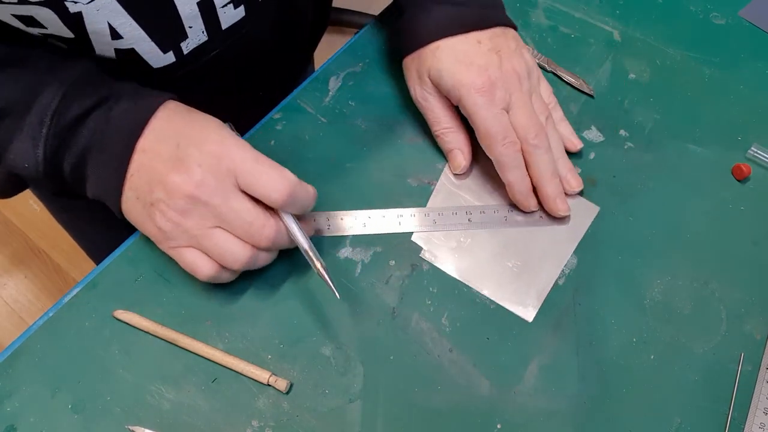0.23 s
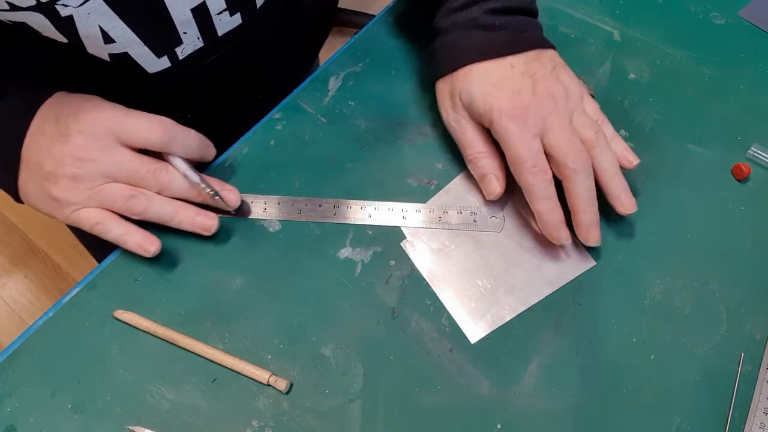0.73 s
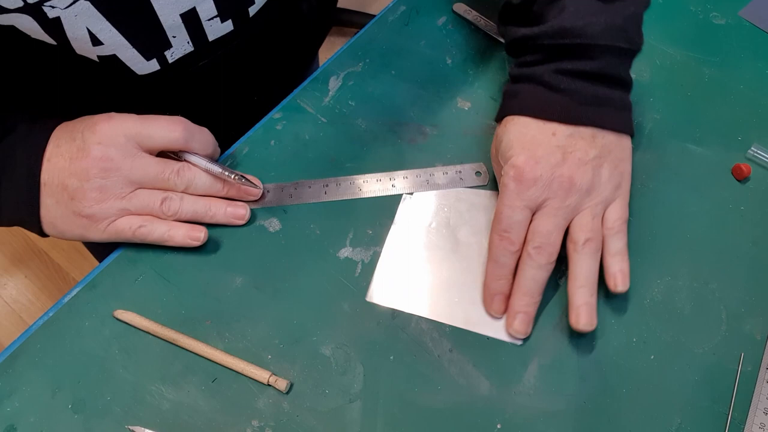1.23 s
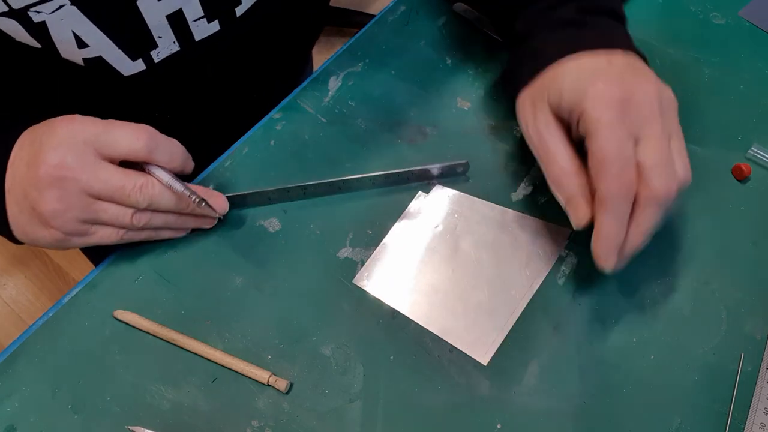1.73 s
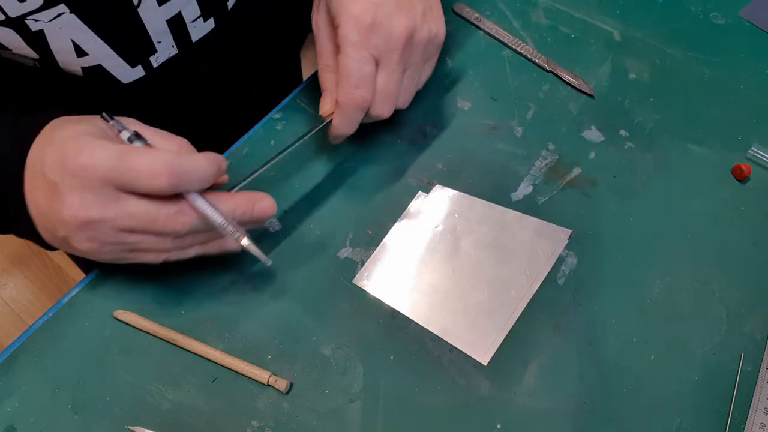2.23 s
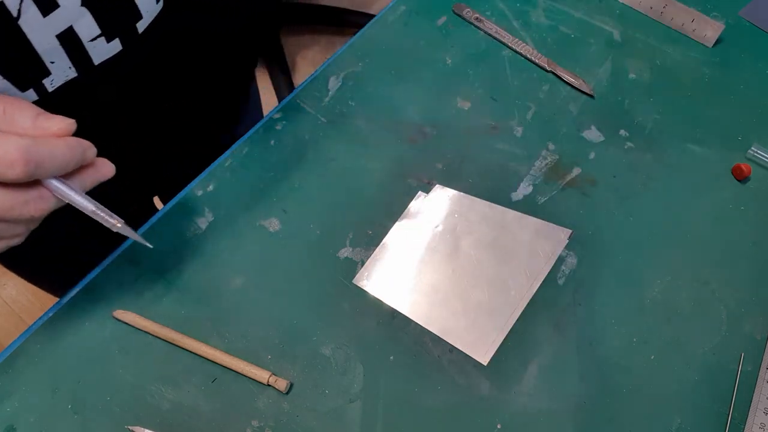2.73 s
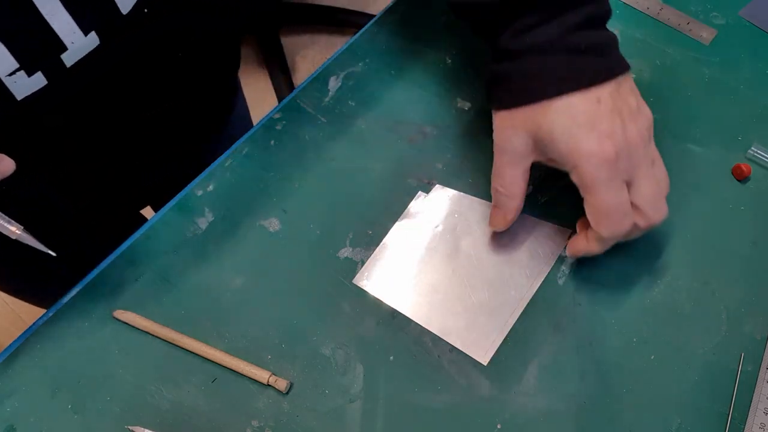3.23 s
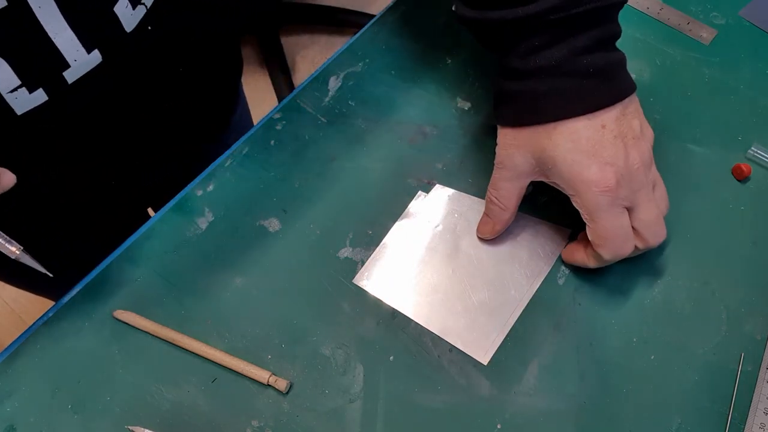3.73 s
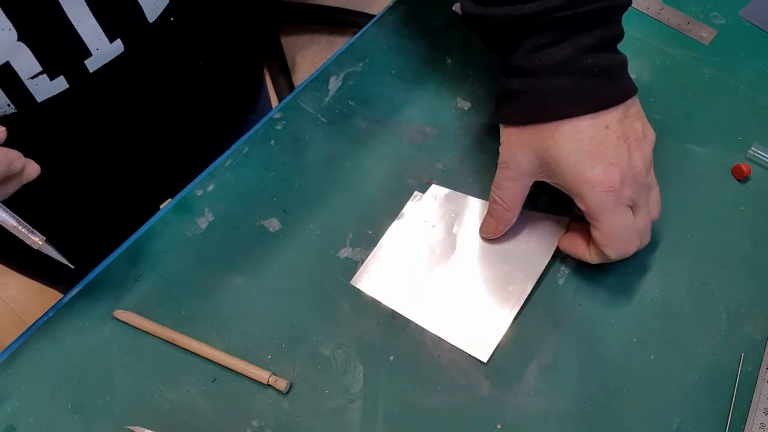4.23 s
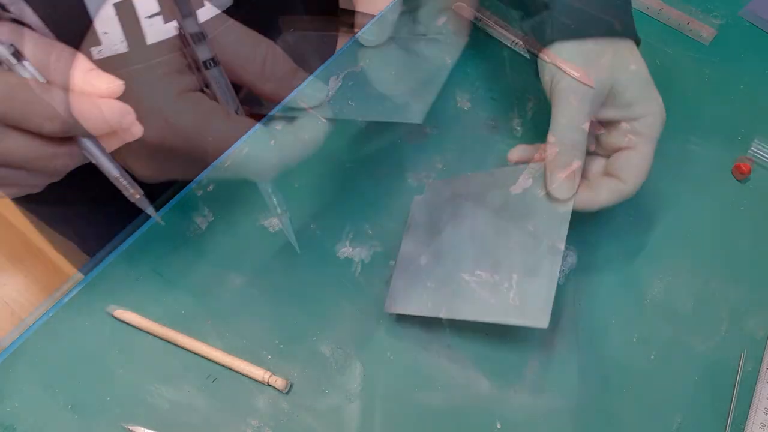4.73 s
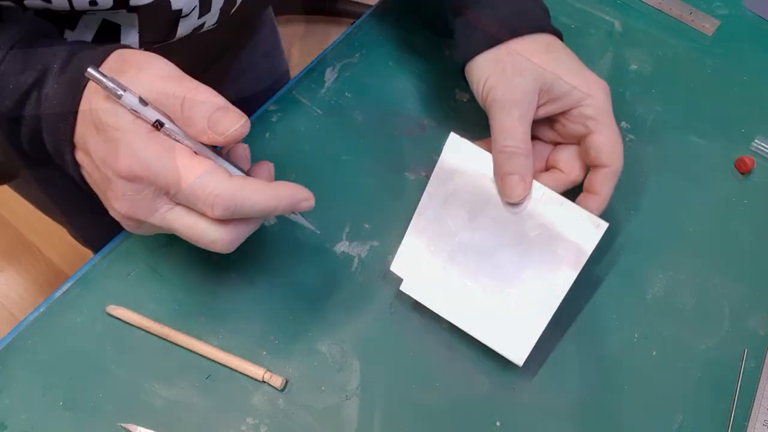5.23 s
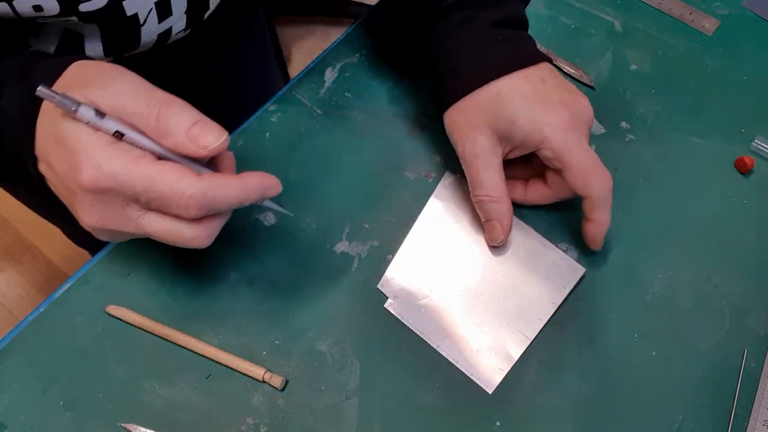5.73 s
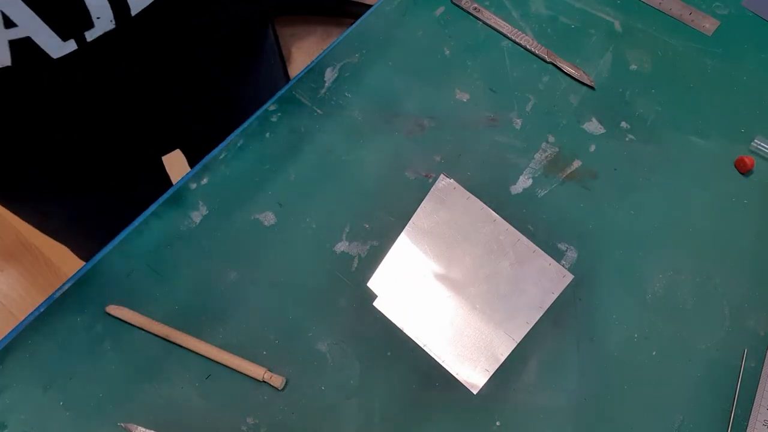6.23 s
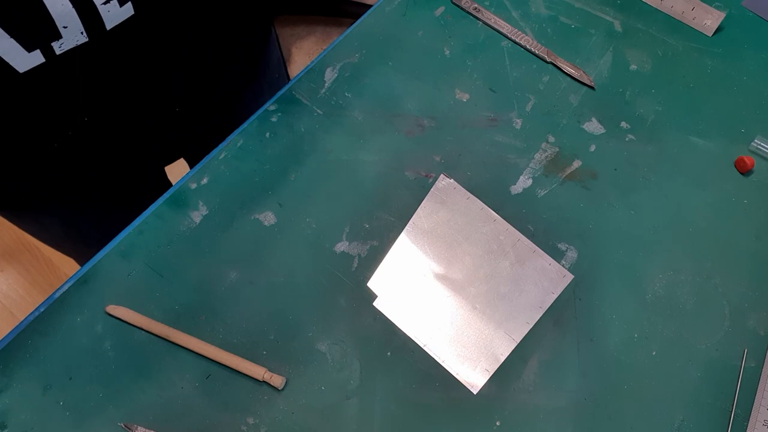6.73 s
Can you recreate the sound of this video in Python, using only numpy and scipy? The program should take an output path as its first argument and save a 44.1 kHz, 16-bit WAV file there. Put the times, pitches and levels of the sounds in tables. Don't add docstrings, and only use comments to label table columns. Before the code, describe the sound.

A small, fairly dry workshop, microphones standing on the bench, so dull low bumps come through. First, grainy metal sliding, strongest after one second; then soft thuds and a ringing steel ruler drop near 2.7 seconds. Quiet follows. A sharp nail snap begins hollow, metallic scraping of a lifted sheet, with picks and a clear thin ping. Faint scrapes and several light metallic taps end it.

```python
import sys
import numpy as np
from scipy import signal
from scipy.fft import rfft, irfft, next_fast_len
from scipy.io import wavfile
from scipy.ndimage import uniform_filter1d, map_coordinates

SR = 44100
rng = np.random.default_rng(int(sys.argv[2]) if len(sys.argv) > 2 else 0)


def generate_wav(sig):
    pcm = np.round(np.clip(np.atleast_2d(sig).T, -1, 1) * 32767).astype(np.int16)
    wavfile.write(sys.argv[1], SR, pcm)


def invert_db(x):
    u = np.asarray(x, float) / 20
    return 10 ** u


N = 307597

# frequency in Hz, level in dB per Hz.
AIR_SPECTRUM = [(140, -3), (200, -3), (300, -6), (500, -9.5), (1000, -14.5), (2000, -15.5), (4000, -22),
                (8000, -26.5), (15700, -23)]
# frequency in Hz, level in dB.
HUM = [(119, -67)]
# frequency in Hz, likeness from -1 to 1.
PORTS_ALIKE = [(60, 0.9), (130, 0.88), (290, -0.11), (640, 0.5), (1400, -0.075), (3000, -0.17),
               (15000, -0.11)]
# frequency in Hz, likeness from -1 to 1.
WALLS_ALIKE = [(200, .9), (400, .75), (750, .45), (1300, -.1), (15000, -.1)]
# frequency in Hz, t60 in seconds.
ROOM_T60 = [(200, 0.15), (1000, 0.31), (4000, 0.38), (12000, 0.11)]
# frequency in Hz, gain in dB.
MIC_COLOUR = [(5000, -0.5), (6800, 0.5), (8400, -5), (10500, -2), (13000, -2), (15500, -1)]

# frequency in Hz, t60 in seconds.
BENCH_MODES = [(63, 0.12), (104.7, 0.15), (215, 0.074), (479, 0.075), (160, 0.096)]
# time in seconds, level in dB.
SWAY = [(0, -52), (1.5, -58), (1.78, -83), (2.06, -63), (2.7, -71), (2.87, -56.5), (2.99, -62), (3.82, -62),
        (4.1, -78.5), (4.52, -59), (5.3, -73), (5.819, -64.5), (6.29, -71.5), (6.429, -56.5), (6.97, -59.5)]
# time in seconds, first mode in dB, second and third mode in dB re first.
SOFT_BLOWS = [(0.084, -48, 3.5, -5), (0.138, -51.5, -3, 3.5), (0.785, -35, -20.5, -19),
              (0.872, -53.5, 3.5, -9), (1.242, -41, -6.5, -21), (2.619, -60, 13, 13.5),
              (2.706, -42.5, 7.5, 11), (2.802, -25.5, -2, -7.5), (3.305, -43.5, -0.5, 0.5),
              (3.424, -37.5, -22, -12.5), (3.694, -44.5, -10.5, -16.5), (3.869, -54.5, 6.5, 4.5),
              (3.886, -47, -7, -5), (5.068, -63.5, -8, 6), (5.149, -62.5, 3, -12), (6.311, -40.5, 10, 4),
              (6.343, -41.5, 0.5, -3), (6.511, -42.5, 4, 4.5), (6.826, -43, -10, -15.5),
              (6.916, -44, -1, -11)]
# time in seconds, first mode in dB, second and third mode in dB re first.
HARD_BLOWS = [(0.471, -61, 3, -2), (1.314, -45, -21, -5.5), (1.623, -49, 0, -7), (6.676, -36, -8, -12.5),
              (6.687, -44, 0, -3.5), (6.74, -50.5, -3, -2)]

# start in seconds, rise in seconds, hold in seconds, hiss in dB,
# pressure in dB.
SLIDES = [(0.0, 0.0019, 0.0022, -63, 1.5), (.05, .05, 0.048, -61, -9.5), (.1, .015, 0.052, -58.5, -4),
          (.12, .12, 0.23, -52, -7), (.26, .06, 0.084, -55.5, -2.5), (.37, 0.03, 0.032, -56.5, 3),
          (.43, 0.03, 0.047, -53.5, 3.5), (.73, .03, 0.017, -81, 18.5), (.775, 0.016, 0.092, -53, -27),
          (.9, 0.015, 0.064, -57.5, -4), (.94, .03, 0.0064, -59.5, 2), (.97, 0.052, 0.19, -52, -20.5),
          (1.1, 0.09, 0.1, -42.5, -20), (1.29, 0.02, 0.04, -56.5, 1.5), (1.31, 0.037, 0.11, -65, 4.5),
          (1.49, 0.039, 0.07, -80, 9.5), (1.635, 0.0033, 0.0056, -71, 20.5), (1.7, 0.042, .02, -72.5, 4),
          (2.1, 0.07, 0.041, -69.5, -32), (2.22, 0.012, 0.055, -85.5, 9), (2.33, 0.065, 0.017, -74, -29),
          (2.5, 0.015, 0.13, -71, -19.5), (2.615, .005, .08, -60, 4.5), (2.715, .005, .075, -57, -21.5),
          (5.035, .02, 0.043, -96, 23), (5.135, 0.0072, 0.013, -90.5, 14), (5.93, 0.14, 0.13, -81, -13.5),
          (6.1, 0.11, 0.094, -76.5, 6.5), (6.325, 0.024, 0.018, -63, 8), (6.52, 0.0046, 0.034, -69, 11),
          (6.58, .02, 0.051, -81.5, -8.5), (6.685, 0.0038, 0.0036, -57.5, 5.5),
          (6.73, 0.0054, 0.047, -68.5, 8.5), (6.87, 0.12, 0.048, -75.5, 6)]
# frequency in Hz, gain in dB.
MAT_COLOUR = [(200, 6.5), (350, 3.5), (1600, 5.5), (3200, 0), (5500, 0), (8200, 2), (10500, 2.5),
              (15500, 0.5)]
# start in seconds, rise in seconds, hold in seconds, level in dB,
# low mode in dB.
RUBS = [
    (2.14, 0.018, 0.023, -74, -18),
    (2.2, .02, 0.075, -79.5, -3),
    (2.33, 0.026, 0.062, -78, 2),
]
# start in seconds, rise in seconds, hold in seconds, ring in dB,
# hiss in dB re ring.
SCRAPES = [(4.12, 0.037, 0.0204, -72, 5.5), (4.17, 0.037, 0.045, -63.5, -7.5),
           (4.256, 0.0017, 0.0097, -42.5, -19), (4.27, 0.0048, 0.043, -48.5, -6.5),
           (4.325, 0.011, 0.056, -56, -8.5), (4.35, 0.03, .015, -52, -9),
           (4.375, 0.024, 0.0095, -44.5, -13.5), (4.46, 0.033, .02, -70.5, -0.5),
           (4.52, 0.0033, 0.062, -53.5, -3.5), (4.575, 0.017, 0.071, -48, -2),
           (4.67, 0.016, 0.045, -73.5, -2), (4.84, 0.063, .004, -69.5, 7), (4.892, 0.0025, 0.017, -64.5, 2),
           (5.0, 0.094, .004, -68.5, -3.5), (5.1, 0.01, 0.2, -71.5, -0.5), (5.45, 0.043, 0.016, -74.5, -1),
           (5.52, 0.079, 0.015, -57, -3.5), (5.685, 0.0068, 0.021, -56, -25),
           (5.695, 0.0098, 0.047, -56.5, -12), (5.72, 0.019, 0.0096, -52.5, -7),
           (5.74, 0.014, 0.006, -53, -5.5), (6.755, 0.011, 0.062, -59, -7.5),
           (6.92, 0.01, 0.06, -63, -21.5)]
# time in seconds, resonance in Hz.
GAP_OPENING = [(4.14, 4480), (4.25, 3620), (4.32, 3400), (4.36, 2770), (4.39, 2220), (4.415, 2040),
               (4.44, 1650), (4.5, 1740), (4.56, 2290), (4.65, 2430), (4.72, 1310), (4.9, 2350)]
# time in seconds, resonance in Hz.
GAP_CLOSING = [(5.05, 3330), (5.2, 5470), (5.5, 2900), (5.67, 2950), (5.695, 2050), (5.735, 2280),
               (5.76, 2700), (5.8, 3000)]

# frequency in Hz, width in Hz, gain in dB.
FLAT_MODES = [(700, 250, -12.5), (972, 60, -2), (1244, 9, -8.5), (2133, 34, -5), (2700, 23, -9),
              (3400, 40, -4)]
# frequency in Hz, width in Hz, gain in dB.
EDGE_HELD_MODES = [(750, 28, -6.5), (1020, 29, -2.5), (1230, 9.5, -7.5), (1630, 45, -2), (2280, 45, -7),
                   (2900, 40, -3.5), (3250, 180, -7.5), (4070, 90, 2.5), (4390, 98, -6.5), (5100, 114, 1),
                   (5700, 130, -8.5), (6460, 120, -3), (7420, 140, -7)]
# frequency in Hz, width in Hz, gain in dB.
CORNER_HELD_MODES = [(788, 14, -0.5), (994, 17.7, 3), (2232, 25.4, 3), (2550, 32, -6), (3154, 19, -6.5),
                     (3470, 13.8, 4), (3740, 30, -5.5), (4340, 45, -6.5), (4520, 39, -11), (5470, 77, -15),
                     (6480, 69, -9)]
# frequency in Hz, width in Hz, gain in dB.
HELD_RULER_MODES = [(4960, 280, 3), (6500, 340, -4), (11000, 500, -1.5), (14260, 1800, -6)]
# frequency in Hz, width in Hz, gain in dB.
STEEL_MODES = [(1680, 21, -9.5), (3190, 420, -12), (3807, 60, -5), (5613, 61, -11.5), (10670, 51, -9.5),
               (13100, 70, -4.5), (14460, 70, -3), (14900, 70, -0.5)]
# frequency in Hz, width in Hz, gain in dB.
BOARD_MODES = [(160, 160, 4.5), (220, 15, 2), (286, 26, 2), (376, 55, 7.5), (477, 25, -1.5), (656, 50, 6.5),
               (856, 9.5, 3.5), (1006, 50, 9), (1313, 33, 6.5), (1610, 38, 1.5), (1760, 12, 2),
               (2124, 61, 5), (2720, 13, -3)]

# time in seconds, peak in dB, ring in Hz, knock in dB re peak, tick in dB re peak.
THUDS = [(0.4628, -38, 1630, 3, 0.5), (0.9033, -50, 1730, -5, 7), (1.5614, -72, 1330, -17, -20),
         (1.6272, -56.5, 1230, 15, -29), (1.6544, -65, 1270, 13, -20), (1.7135, -54, 1190, 6.5, -7),
         (1.74, -49.5, 1180, 6, -12), (1.7644, -50.5, 1198, 1, -9.5), (3.4261, -55, 1712, -17.5, -28.5),
         (3.6874, -65, 1320, -13.5, -20), (3.8796, -63, 1760, 3.5, -13.5), (6.3415, -41, 1610, -4.5, -9)]
# time in seconds, peak in dB, ring in Hz, knock in dB re peak, tick in dB re peak.
TAPS = [(1.5614, -56, 3400, -9, -12), (1.9944, -66.5, 2700, -18.5, -18), (3.3074, -63, 2282, -5, -2),
        (5.4988, -53.5, 2900, -4, -21.5), (5.7576, -41, 2630, -23, -18), (5.7867, -42, 3100, -31, -8.5),
        (6.3135, -48.5, 3180, 3.5, -30), (6.5146, -43.5, 3400, -4, -34), (6.6817, -38, 3080, -9, -34),
        (6.7486, -40, 3220, -4.5, -30), (6.9237, -60.5, 3080, -14.5, -19)]
# time in seconds, peak in dB, ring in Hz, knock in dB re peak,
# tick in dB re peak.
TICKS = [(0.179, -38.5, 7100, -31, -1.5), (0.7444, -54.5, 5300, -26, -20), (0.7736, -46.5, 5950, -35, -22),
         (0.7916, -38, 5700, -28, -26), (2.6768, -45.5, 5690, -29.5, -8),
         (2.6775, -40.5, 10310, -23.5, -19), (5.1058, -48.5, 6200, -24.5, -34),
         (5.3078, -60.5, 5200, -33.5, 3), (6.5879, -55, 4890, -30, -8)]
# time in seconds, peak in dB, ring in Hz, knock in dB re peak,
# tick in dB re peak.
TOUCH = [
    (4.8932, -41, 3500, -14.5, -19),
]
# time in seconds, peak in dB, ring in Hz, knock in dB re peak,
# tick in dB re peak.
FLICK = [
    (4.8968, -40, 3290, -5, -17.5),
    (5.6952, -58, 2150, -25, -17),
]
# time in seconds, level in dB, left-right difference in dB.
PLUCKS = [
    (4.8934, -10, 0),
    (4.8952, -8.5, 1.5),
    (4.8975, -4.5, 1),
]
# time in seconds, peak in dB, ring in Hz, knock in dB re peak,
# tick in dB re peak.
PICKS = [
    (4.5203, -36.5, 3130, -2, -25.5),
    (4.55, -45, 3060, 7, -10),
    (4.581, -38, 2390, -6.5, -16),
]
# time in seconds, peak in dB, ring in Hz, knock in dB re peak,
# tick in dB re peak.
NAIL = [
    (4.2532, -30, 4500, -69, -13),
    (4.2553, -24, 3700, -18.5, -27.5),
    (4.2568, -39, 3200, -22, -34),
]
# time in seconds, peak in dB, ring in Hz, knock in dB re peak,
# tick in dB re peak.
RULER_HITS = [
    (2.6174, -37, 3250, -4.5, 9),
    (2.7092, -16, 3058, -3.5, -13.5),
    (2.8032, -7.5, 3200, -5, -20),
]

OFF_MAT_S, FREED_S = 4.38, 0.12
GRIP_S = 4.85
STROKE_RISE_DB, STROKE_SAG_DB = 21.5, 2.5


def unit(x):
    return x / np.sqrt(np.mean(x ** 2) + 1e-20)


def along(points, hz):
    f, v = np.transpose(points)
    return np.interp(np.log(hz + 1), np.log(f + 1), v)


def wobble(rate_hz, size=N):
    knots = rng.standard_normal(int(size * rate_hz / SR) + 4)
    return map_coordinates(knots, [np.arange(size) * rate_hz / SR])


def filtered(x, response):
    m = next_fast_len(x.shape[-1] + 8192)
    return irfft(rfft(x, m) * response(np.fft.rfftfreq(m, 1 / SR)), m)[..., :x.shape[-1]]


def resonance(f, hz, width_hz):
    return 1j * f * width_hz / (hz * hz - f * f + 1j * f * width_hz + 1e-9)


def modes(f, body):
    return sum((-1) ** k * invert_db(db) * resonance(f, hz, w) for k, (hz, w, db) in enumerate(body))


def ports(pair, alike):
    def mid_side(hz):
        turn = np.arccos(np.clip(along(alike, hz), -1, 1)) / 2
        return np.array([np.cos(turn), np.sin(turn)])
    mid, side = filtered(pair, mid_side)
    return np.array([mid + side, mid - side])


def panned(db):
    return invert_db(np.array([db / 2, -db / 2]))


def air():
    tone = filtered(ports(rng.standard_normal((2, N)), PORTS_ALIKE),
                    lambda f: invert_db(along(AIR_SPECTRUM, f)) * (f > 140))
    rumble = filtered(ports(rng.standard_normal((2, N)), PORTS_ALIKE),
                      lambda f: resonance(f, 73, 60) ** 2 + 0.9 * resonance(f, 32, 32) ** 2)
    t, hum = np.arange(N) / SR, 0
    for hz, db in HUM:
        level = invert_db(db + 2.0 + 3.6 * wobble(17.0))
        hum = hum + level * np.sin(2 * np.pi * hz * t + 0.24 * wobble(8.3))
    return invert_db(-72.0 + 0.26 * wobble(1.7)) * unit(tone) + invert_db(-67) * unit(rumble) + hum


def bench():
    out, t = np.zeros((2, N + SR)), np.arange(SR // 4) / SR
    blows = []
    for row in SOFT_BLOWS:
        stiffen_db = 2.7 * np.clip(row[1] + row[-1] + 45.5, 0, 8)
        blows.append((*row, row[-1] - 31.5 + stiffen_db, row[-1] - 2.5))
    for row in HARD_BLOWS:
        blows.append((*row, row[-1] + 3, row[-1] - 2.5))
    for s, db, *rel_db in blows:
        start = round((s + .004) * SR)
        for (hz, t60_s), mode_db in zip(BENCH_MODES, [0, *rel_db]):
            drift = 0.73 * wobble(18, size=len(t))
            skew = rng.normal(0, .03 + hz / 2000) * np.array([[1], [-1]])
            tune = rng.normal(1, .012)
            ring = np.sin(2 * np.pi * hz * tune * t + drift - drift[0] + skew)
            ring = ring * (1 - np.exp(-t * hz / .5))
            out[:, start:][:, :len(t)] += invert_db(db + mode_db + 6.0 - 60 * t / t60_s) * ring
    s, db = np.transpose(SWAY)
    stir = unit(filtered(ports(rng.standard_normal((2, N)), [(60, 0.39)]),
                         lambda f: resonance(f, 66, 36) ** 2))
    sway_db = np.interp(np.arange(N) / SR, s, np.minimum(db, -58)) + 0.6 * wobble(10)
    return (out[:, :N] + invert_db(sway_db) * stir) * panned(-1.2)[:, None]


def friction(rows, colour, fall_db_s, grain_db, alike, pan_db, patchy_db):
    first = round(rows[0][0] * SR) // 4096 * 4096
    size = min(N, round((rows[-1][0] + .5) * SR)) - first
    grit = invert_db(grain_db * wobble(900, size) + 1.3 * grain_db * wobble(60, size))
    noise = ports(unit(grit * rng.standard_normal((2, size))), alike)
    hz, t, z = signal.stft(noise, SR, nperseg=512, noverlap=384)
    patches = uniform_filter1d(rng.standard_normal(z.shape[1:]), size=7, axis=0)
    z = z * invert_db(patchy_db * unit(uniform_filter1d(patches, size=12, axis=1)))
    power, t = np.zeros(z.shape[1:]), t + first / SR
    for s, rise_s, hold_s, db, tone_db in rows:
        on = (t > s) & (t < s + rise_s + hold_s + .25)
        u = t[on] - s
        ease_db = -STROKE_RISE_DB * np.clip(1 - u / max(rise_s, .001), 0, 1) ** 1.2
        ease_db -= STROKE_SAG_DB * np.clip((u - rise_s) / max(hold_s, .001), 0, 1)
        ease_db -= fall_db_s * np.clip(u - rise_s - hold_s, 0, None)
        onset = np.clip(u / 0.0014, 0, 1)
        power[:, on] += (onset * colour(hz[:, None], t[on], db + ease_db, tone_db, ease_db)) ** 2
    sound = signal.istft(z * np.sqrt(power * SR / 2), SR, nperseg=512, noverlap=384)[1][:, :size]
    return np.pad(sound, ((0, 0), (first, N - first - size))) * panned(pan_db)[:, None]


def slides():
    def colour(hz, t, hiss_db, press_db, ease_db):
        rasp_db = -3 + 0.44 * press_db
        drag_db = press_db - 0.38 * ease_db
        octave = np.log2(hz + 1)
        drag = np.clip((11.2 - octave) / 2.1, 0, 1)
        hiss = np.clip((octave - 11.8) / 1.2, 0, 1)
        level_db = hiss_db - 39.0 + drag * (drag_db + 7.0) + (1 - drag - hiss) * (rasp_db + 9)
        return invert_db(level_db + along(MAT_COLOUR, hz)) * abs(1.11 + invert_db(-1.5) * modes(hz, FLAT_MODES))
    return friction(SLIDES, colour, 299.5, grain_db=1.0, alike=PORTS_ALIKE, pan_db=-0.15, patchy_db=1.94)


def rubs():
    def colour(hz, t, db, low_db, ease_db):
        low = invert_db(low_db) * resonance(hz, 2170, 110)
        return invert_db(db - 26) * abs(modes(hz, HELD_RULER_MODES) + low)
    return friction(RUBS, colour, 300, grain_db=0.0, alike=PORTS_ALIKE, pan_db=-2.0, patchy_db=2.0)


def scrapes():
    def colour(hz, t, ring_db, hiss_db, ease_db):
        gap_hz = np.interp(t, *np.transpose(GAP_OPENING + GAP_CLOSING))
        skirt = np.where(t < GRIP_S, 0.64, 0.32)
        wedge = abs(resonance(hz, gap_hz, 0.37 * gap_hz) ** 2)
        wedge = wedge + skirt * abs(resonance(hz, 1.2 * gap_hz, gap_hz) ** 2)
        flex_db = -18.5 + 20.5 * np.clip((t - OFF_MAT_S) / 0.11, 0, 1) - 0.5 * ease_db
        flex_db = flex_db + np.where(t < GRIP_S + .1, 3, -12)
        flex = invert_db(flex_db) * abs(resonance(hz, 1500, 1630) ** 2)
        hiss = invert_db(hiss_db - 2.0) * np.clip(hz / 5500, 0, 1) ** 3
        return invert_db(ring_db - 33) * np.hypot(wedge + flex, hiss)
    edge = friction(SCRAPES, colour, 560, grain_db=1.0, pan_db=-1.7, patchy_db=3.0,
                    alike=[(300, 0.42), (1500, 0.42), (3000, 0.33), (9000, 0.062)])
    t = np.arange(N) / SR
    free = edge * np.clip(0.87 + (t - OFF_MAT_S) / FREED_S, .1, 1)
    first, grip = round(SCRAPES[0][0] * SR), round(GRIP_S * SR)
    ring_db, corner_db = 8, -7
    out = invert_db(-4.5) * edge
    out[:, first:grip] += invert_db(ring_db) * filtered(free[:, first:grip], lambda f: modes(f, EDGE_HELD_MODES))
    out[:, grip:] += invert_db(ring_db + corner_db) * filtered(free[:, grip:], lambda f: modes(f, CORNER_HELD_MODES))
    return out


def room(size):
    hz, t, z = signal.stft(ports(rng.standard_normal((2, size)), WALLS_ALIKE), SR, nperseg=256)
    closing = invert_db(-7 * np.clip((t - .07) / 0.055, 0, 4) ** 1.5)
    decay = invert_db(-60 * t / along(ROOM_T60, hz)[:, None])
    tail = signal.istft(z * decay * closing, SR, nperseg=256)[1][:, :size]
    return np.pad(tail, ((0, 0), (130, 0)))[:, :size] / np.linalg.norm(tail[0])


def contacts(rows, crack_s, ring_q, broad, knock_s, knock_hz, wet_db, alike, pan_db, lag=0, body=(),
             body_db=0, sheen=.05, snap=0, broad_hz=4500):
    out, t = np.zeros((2, N + SR)), np.arange(SR // 5) / SR

    def solid(f):
        return 1 + invert_db(body_db) * modes(f, body)

    for s, db, hz, knock_db, tick_db in rows:
        def crack(f):
            return resonance(f, hz, hz / ring_q) ** 2 + broad * resonance(f, 4100, broad_hz)

        def knock(f):
            return resonance(f, knock_hz, 1.3 * knock_hz) ** 2

        def tick(f):
            return resonance(f, 11000, 9000) ** 2

        parts = [(0, crack_s, crack, hz),
                 (knock_db, knock_s, knock, 0.88 * knock_hz),
                 (tick_db, 4.3 * crack_s, tick, 12000)]
        direct, echo, tail = 0, 0, room(len(t))
        for part_db, life_s, colour, centre_hz in parts:
            burst = rng.standard_normal((2, len(t))) * invert_db(-60 * t / life_s) * np.clip(t / 0.00022, 0, 1)
            burst[:, SR // 3000] += snap
            part = filtered(burst, lambda f: colour(f) * solid(f))
            part *= invert_db(part_db) / abs(part).max(axis=1, keepdims=True)

            def walls(f):
                low_cut = resonance(f, 0.16 * centre_hz, 1.0 * centre_hz)
                return low_cut * resonance(f, centre_hz, 4 * centre_hz) + sheen * resonance(f, 11000, 6000)

            answer = filtered(tail, walls)
            far, near = part
            same = min(alike, 1) ** min(centre_hz / 1500, 1) ** 2
            left = same * np.pad(near, (lag, 0))[:len(t)] + np.sqrt(1 - same ** 2) * far
            side_db = pan_db * min(centre_hz / 2400, 1) ** 2
            direct = direct + np.array([left, near]) * panned(side_db)[:, None]
            echo = echo + answer * np.linalg.norm(part) / np.linalg.norm(answer)
        out[:, round(s * SR):][:, :len(t)] += invert_db(db + 1.5) * (direct + invert_db(wet_db) * echo)
    return out[:, :N]


def thuds():
    return contacts(THUDS, crack_s=0.02, ring_q=1.55, broad=0.052, knock_s=0.079, knock_hz=660,
                    wet_db=-3.5, alike=0.24, pan_db=-4.0)


def taps():
    return contacts(TAPS, crack_s=0.029, ring_q=4.3, broad=0.36, knock_s=0.076, knock_hz=940,
                    wet_db=-12.0, alike=0.23, pan_db=-3.8)


def ticks():
    return contacts(TICKS, crack_s=0.04, ring_q=2.2, broad=.03, knock_s=0.011, knock_hz=875,
                    wet_db=-7.5, alike=0.9, pan_db=2.2)


def plucks():
    out, kick = np.zeros((2, N + SR)), np.eye(1, SR // 4)
    ring = filtered(kick, lambda f: modes(f, CORNER_HELD_MODES))
    for s, db, pan_db in PLUCKS:
        out[:, round(s * SR):][:, :SR // 4] += invert_db(db) * ring * panned(pan_db)[:, None]
    return out[:, :N]


def flick():
    return contacts(TOUCH + FLICK, crack_s=0.0118, ring_q=1.0, broad=0.3, knock_s=0.014, knock_hz=900,
                    wet_db=-9.5, alike=0.67, pan_db=2.5, body=CORNER_HELD_MODES, body_db=19.5, snap=1.6)


def picks():
    return contacts(PICKS, crack_s=0.02, ring_q=1.16, broad=0.224, knock_s=0.074, knock_hz=1120,
                    wet_db=-4.5, alike=0.36, pan_db=-13.5, body=EDGE_HELD_MODES, body_db=8.0)


def nail():
    return contacts(NAIL, crack_s=0.0077, ring_q=3.1, broad=0.22, knock_s=0.022, knock_hz=1100,
                    wet_db=-19.5, alike=0.81, pan_db=-4.0, body=[(3200, 110, 12), (4560, 93, -5.0)],
                    body_db=2.5)


def ruler():
    return contacts(RULER_HITS, crack_s=0.0092, ring_q=3.3, broad=0.32, knock_s=0.028, knock_hz=1045,
                    wet_db=-7.5, alike=0.56, pan_db=-5, lag=round(SR / 2500),
                    body=BOARD_MODES + STEEL_MODES, body_db=4.5, sheen=0.2, snap=3, broad_hz=3000)


def scene():
    background = air() + bench()
    rubbing = slides() + rubs() + scrapes()
    small_contacts = thuds() + taps() + ticks()
    sheet_contacts = plucks() + flick() + picks() + nail()
    return background + rubbing + small_contacts + sheet_contacts + ruler()


def low_pass(x):
    return signal.sosfilt(signal.butter(12, 17000, fs=SR, output="sos"), x)


def record(dry):
    def microphone(hz):
        band_limit = np.where(hz < 15750, 1, invert_db(-28.0))
        low_cut = np.clip(hz / 50, 0, 1) ** 4
        return invert_db(along(MIC_COLOUR, hz)) * band_limit * low_cut
    return low_pass(filtered(dry, microphone))


dry = scene()
out = record(dry)
generate_wav(out)
```